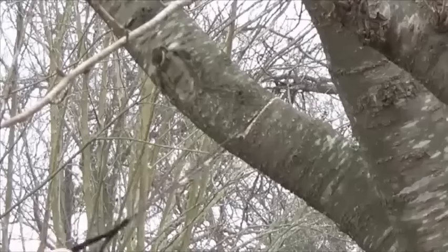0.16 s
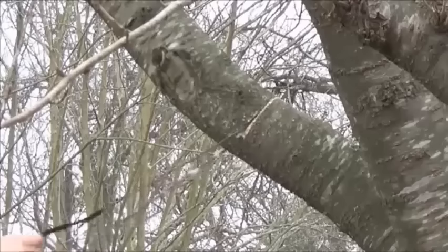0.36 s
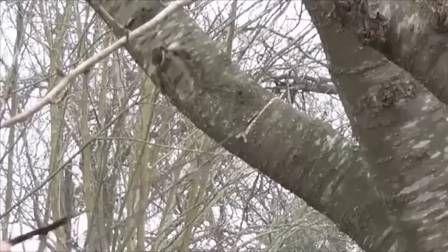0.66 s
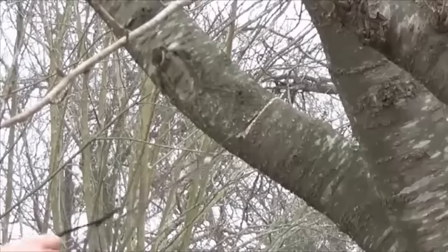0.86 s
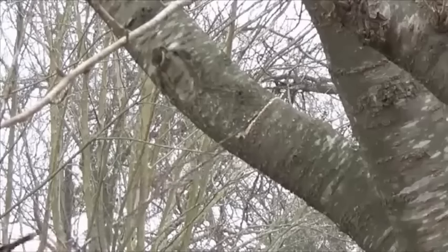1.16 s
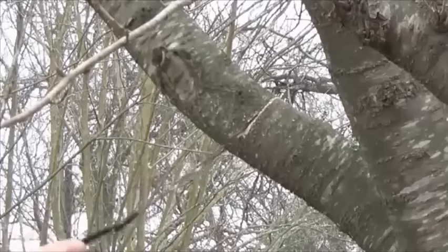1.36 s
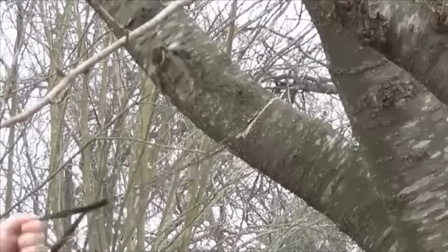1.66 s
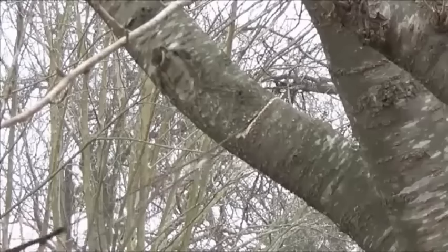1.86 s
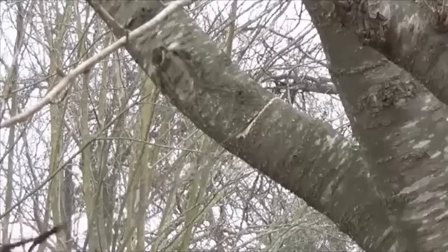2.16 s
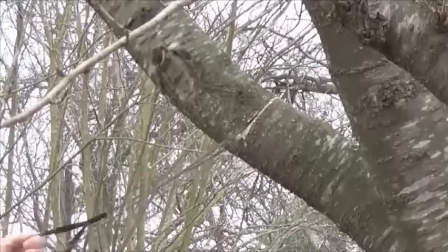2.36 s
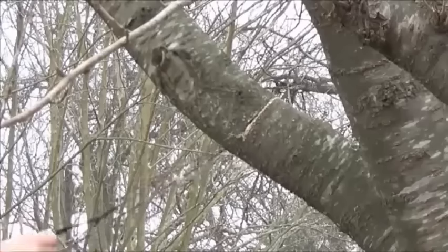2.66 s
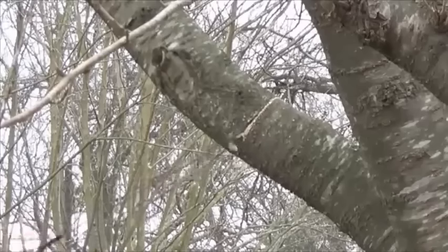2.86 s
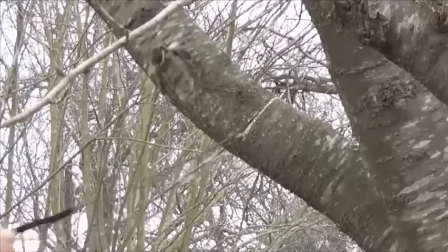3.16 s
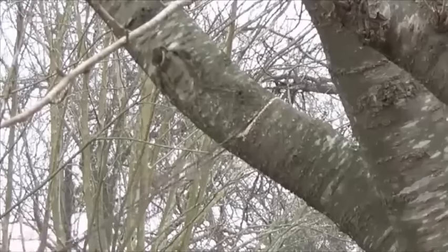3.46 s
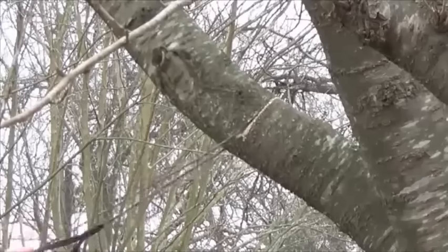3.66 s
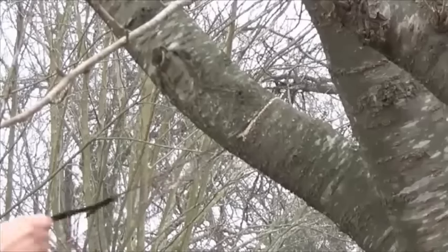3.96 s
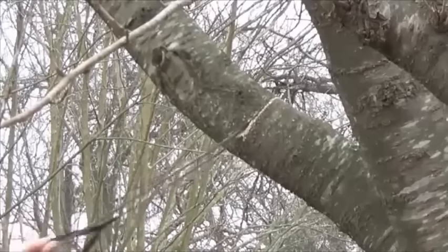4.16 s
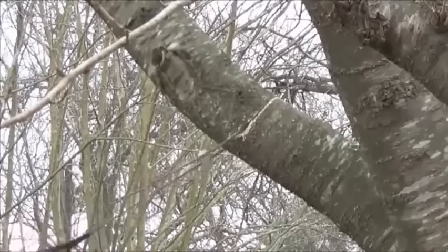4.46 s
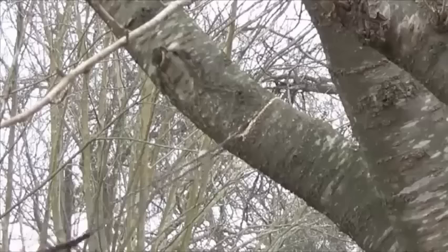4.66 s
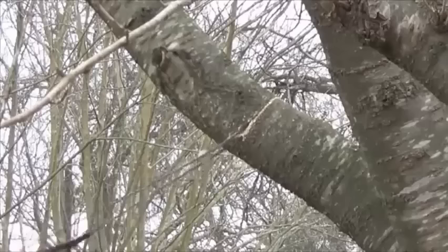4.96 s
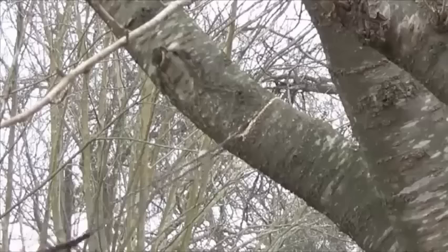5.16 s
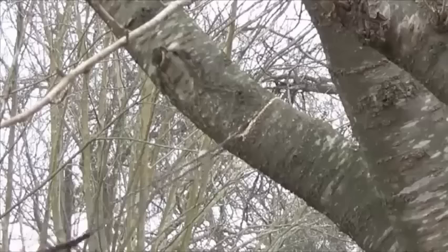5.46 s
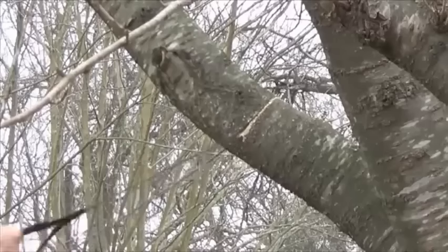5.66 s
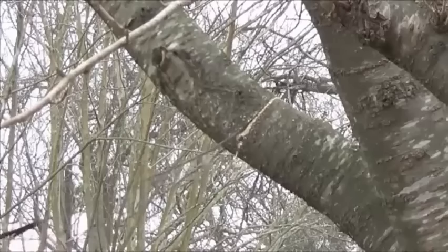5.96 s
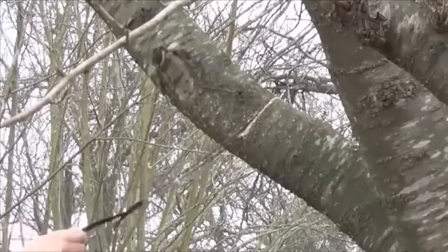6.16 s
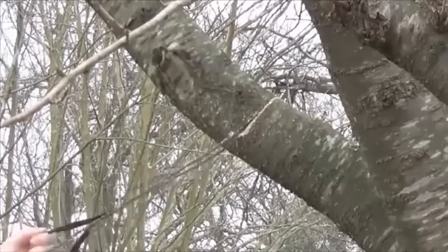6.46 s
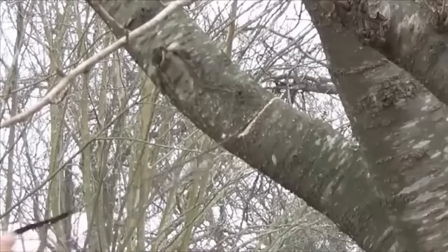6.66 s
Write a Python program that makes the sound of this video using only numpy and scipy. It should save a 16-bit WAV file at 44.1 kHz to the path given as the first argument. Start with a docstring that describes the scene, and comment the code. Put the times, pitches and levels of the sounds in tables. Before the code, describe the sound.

A hand-pulled chain saw rasps back and forth through a tree limb outdoors, with woody chatter, rattling links and faint bird whistles.

```python
"""A hand chain saw rasps back and forth through a tree limb near the microphone, about three pulls a second.
Each pull speeds up, holds and slows: teeth knock the limb, steel links ring and fibres tear;
roughly every other pull bites deeper and sprays a bright fizz. The slack chain rattles in the turns.
Behind it, outdoors and in mono: faint air, a far engine and a few thin rising whistles like a bird's."""
import sys
import numpy as np
from scipy import signal
from scipy.fft import rfft, irfft
from scipy.io import wavfile
from scipy.ndimage import uniform_filter1d

SR = 44100
rng = np.random.default_rng(int(sys.argv[2]) if len(sys.argv) > 2 else 0)


def persist_wave(psi):
    """Save psi, clipped to +-1, as 16-bit WAV."""
    counts = np.round(np.clip(psi, -1, 1) * 32767).astype(np.int16)
    wavfile.write(sys.argv[1], SR, np.atleast_2d(counts).T)


N = 299880
TIME = np.arange(N) / SR
HZ = np.fft.rfftfreq(N, 1 / SR)


def gain_of(db):
    """Decibels to amplitude."""
    return 10 ** (np.asarray(db) / 20)


def unit_rms(x):
    """Scales to rms 1."""
    return x / np.sqrt(np.mean(x ** 2) + 1e-20)


def add(mix, start_s, sound):
    """Mixes a sound in at a time."""
    part = mix[max(round(start_s * SR), 0):][:len(sound)]
    part += sound[:len(part)]


def wander(rate_hz):
    """Smooth random drift of rms 1, mostly slower than rate_hz."""
    return unit_rms(irfft(rfft(rng.standard_normal(N)) / (1 + (HZ / rate_hz) ** 4), N))


def swell(middle_s, length_s):
    """A brief smooth rise and fall."""
    return np.exp(-(2 * (TIME - middle_s) / length_s) ** 2)


def eased(u):
    """Rises smoothly from 0 to 1 as u does."""
    return np.sin(np.pi / 2 * np.clip(u, 0, 1)) ** 2


def coloured(x, spectrum):
    """Filters by a spectrum and scales to rms 1."""
    freq_hz, gain_db = np.transpose(spectrum)
    curve_db = np.interp(np.log(HZ + 1), np.log(freq_hz), gain_db)
    return unit_rms(irfft(rfft(x) * gain_of(curve_db), N))


def ring(drive, modes):
    """Drives a set of damped modes; a unit blow rings with a peak of 1."""
    t = np.arange(4096) / SR
    response = np.zeros(len(t))
    for k, (hz, width_hz, db) in enumerate(modes):
        decay = gain_of(db) * width_hz * np.exp(-np.pi * width_hz * t)
        response += (-1) ** (k // 2) * decay * np.sin(2 * np.pi * hz * t)
    return signal.oaconvolve(drive, response / abs(response).max())[:N]


def blows(rows):
    """One impulse for each row of start_s, level_db."""
    out = np.zeros(N)
    for start_s, db in rows:
        add(out, start_s, gain_of([db]))
    return out


def grains(per_s, spread_db):
    """Random tiny impulses of uneven size and either sign."""
    size = gain_of(spread_db * np.minimum(rng.exponential(1, N), 4)) * rng.choice([-1, 1], N)
    return unit_rms(size * (rng.random(N) < per_s / SR))


# Tone of the open air: freq_hz, gain_db
AIR_SPECTRUM = [(20, -45), (45, -19.5), (80, -5.5), (130, -5.5), (200, -4), (550, -18), (800, -14),
                (1200, -17.5), (3000, -26), (10000, -57), (16000, -42)]
# Its rise and fall at the microphone: time_s, level_db
AIR_LEVELS = [(0, -36), (.5, -36.5), (1.2, -38.5), (2.1, -36.5), (3, -38.5), (3.7, -36.5), (4.5, -36),
              (5.15, -34), (5.5, -38.5), (6.2, -36.5), (6.8, -40.5)]
def outdoor_air(swell_db=1.5):
    """Low noise of the air all around, swelling gently."""
    level_db = np.interp(TIME, *np.transpose(AIR_LEVELS)) + swell_db * wander(3.1)
    return gain_of(level_db) * coloured(rng.standard_normal(N), AIR_SPECTRUM)


# An engine far off: time_s, pitch_hz, level_db
ENGINE_PATH = [(0, 118.5, -48), (.5, 118.8, -47.5), (1.201, 125.1, -45), (2, 130.6, -42.5),
               (2.798, 130.5, -45), (3.799, 135.2, -45), (4.3, 137.2, -43), (4.699, 140.6, -41),
               (5.3, 142.5, -45.5), (5.8, 143.9, -75), (6.8, 139.6, -48)]
# Its harmonics: multiple, gain_db
ENGINE_HARMONICS = [(1, 3), (2, -1), (4, 7)]
def far_engine(waver=0.01, flicker_db=1.5):
    """A distant engine drones on three harmonics that waver in pitch and level."""
    time_s, pitch_hz, level_db = np.transpose(ENGINE_PATH)
    cycles = np.cumsum(np.interp(TIME, time_s, pitch_hz) * (1 + waver * wander(16.5))) / SR
    out = np.zeros(N)
    for multiple, gain_db in ENGINE_HARMONICS:
        level = gain_of(np.interp(TIME, time_s, level_db) + gain_db + flicker_db * wander(4.7))
        out += level * np.sin(2 * np.pi * multiple * cycles)
    return out


# Soft bumps in the background: middle_s, length_s, pitch_hz, level_db
BUMPS = [(0.118, 0.065, 94.6, -44), (2.05, 0.085, 103.9, -29.5), (3.8, 0.19, 132, -35)]
def low_bumps():
    """Low, unsteady tones swell and fade in a moment."""
    out = np.zeros(N)
    for middle_s, length_s, hz, db in BUMPS:
        tone = np.sqrt(2) * np.sin(2 * np.pi * hz * TIME + wander(29))
        out += gain_of(db) * swell(middle_s, length_s) * tone
    return out


# Whistles far from the microphone, one list each: time_s, pitch_hz, level_db
WHISTLES = [
    [(2.12, 2330, -44), (2.22, 2430, -38), (2.27, 2420, -44), (2.33, 2400, -60)],
    [(4.5, 2850, -50), (4.55, 2950, -43), (4.61, 3080, -48)],
    [(5.28, 2060, -42), (5.36, 2230, -35), (5.45, 2510, -38), (5.52, 2830, -32), (5.6, 3040, -36),
     (5.68, 3240, -35.5), (5.75, 3460, -44)],
]
def far_bird():
    """Thin, fluttering whistles that glide upward."""
    out = np.zeros(N)
    bend, flutter = 1 + .006 * wander(110), gain_of(1.4 * wander(60))
    for whistle in WHISTLES:
        time_s, pitch_hz, level_db = np.transpose(whistle)
        cycles = np.cumsum(np.interp(TIME, time_s, pitch_hz) * bend) / SR
        sounding = (TIME > time_s[0]) & (TIME < time_s[-1])
        level = uniform_filter1d(gain_of(np.interp(TIME, time_s, level_db)) * sounding, size=600)
        out += level * flutter * np.sin(2 * np.pi * cycles)
    return out


def tree_echo(sound, echo_db=-20, t60_s=0.43, gap_s=.008):
    """Trunks and twigs around the saw scatter a faint, short echo back to the microphone."""
    t = TIME[:SR // 2]
    taps = rng.standard_normal(len(t)) * (rng.random(len(t)) < .03)
    taps *= (t > gap_s) * gain_of(-60 * t / t60_s)
    return gain_of(echo_db) * signal.oaconvolve(sound, taps / np.linalg.norm(taps))[:N]


def link_glints(force, per_s=2400, ring_s=.008, spread_db=0.8):
    """Links and cutters strike one another; each contact rings briefly at its own high pitch."""
    out, t = np.zeros(N), np.arange(1200) / SR
    pitches_hz = np.linspace(4500, 15500, 500)
    pings = np.exp(-t / ring_s) * np.sin(2 * np.pi * pitches_hz[:, None] * t)
    when, softness, pitch = rng.random((int(per_s * TIME[-1]), 3)).T
    peaks = force[(when * N).astype(int)] * gain_of(-spread_db * np.log(softness + 0.017))
    for start_s, peak, k in zip(when * TIME[-1], peaks, (pitch * len(pings)).astype(int)):
        add(out, start_s, peak * pings[k])
    return unit_rms(out)


# Tone of the loose chain outside the cut: freq_hz, gain_db
SLACK_SPECTRUM = [(500, 8.5), (1000, -9), (2500, 9.5), (4500, 3.5), (8000, 2.5), (11000, -9), (13500, -7),
                  (16000, -16)]
def slack_rattle(glints, level, rattle_db=-1, flutter_db=2.5, glint_db=-4):
    """The loose lengths of chain never stop rattling softly, even between pulls."""
    shake = gain_of(flutter_db * wander(46))
    contacts = grains(per_s=2000, spread_db=2.6) + gain_of(glint_db) * glints
    return level * gain_of(rattle_db) * coloured(shake * contacts, SLACK_SPECTRUM)


# Tone of the steel, ticking here and scraping in the cut: freq_hz, gain_db
STEEL_SPECTRUM = [(400, -50), (1000, -2.5), (1600, -1.5), (2600, 1), (4200, 2), (5600, -4.5), (7500, -2.5),
                  (11000, -6.5), (14000, -18), (16000, -14)]
# The slack chain ticks close by: start_s, relative_db
TICKS = [(1.9627, -16), (2.9167, -20), (3.2031, -22), (3.245, -14), (3.551, -16), (4.1486, -23),
         (6.7362, -16), (6.7675, -13.5)]
# A hollow pop and a sharp pip: middle_s, pitch_hz, peak_db, half_length_s
POPS = [(3.529, 878, -12.5, 0.00062), (5.3428, 5200, -18, .0008)]
def chain_ticks(decay_s=0.0021, tick_db=-9):
    """Dry ticks and short pops while the chain turns round."""
    out, t = np.zeros(N), np.arange(1024) / SR
    for start_s, db in TICKS:
        add(out, start_s, gain_of(db + tick_db) * np.exp(-t / decay_s))
    out *= coloured(rng.standard_normal(N), STEEL_SPECTRUM)
    for middle_s, hz, db, half_length_s in POPS:
        t = TIME - middle_s
        out += gain_of(db) * np.exp(-(t / half_length_s) ** 2) * np.cos(2 * np.pi * hz * t)
    return out


# Bright fizz of cut wood at close range: freq_hz, gain_db
FIZZ_SPECTRUM = [(2000, -24), (5000, -23), (7200, -8.5), (9300, -3.5), (10500, 0.5), (11400, 2),
                 (12300, -2.5), (13000, -11), (13700, -16), (15000, -14.5), (16000, -5)]
def fibre_fizz(force, glints, level, fizz_db=-4.5):
    """Dense tiny fractures as the cutters shave the wood, and the cutters' own ringing."""
    cutting = force * grains(per_s=10000, spread_db=0.96) + glints
    return level * gain_of(fizz_db) * coloured(cutting, FIZZ_SPECTRUM)


# Resonances of the steel links: pitch_hz, width_hz, gain_db
LINK_MODES = [(2500, 600, -13), (3323, 145, -8), (3520, 110, 5.5), (4380, 310, -11), (4920, 87, -4),
              (4940, 44, -2)]
# Links clink together near the microphone: start_s, relative_db
CLINKS = [(0.3865, -15), (1.6114, -19), (2.5232, -14), (3.2869, -23), (3.589, -14.5), (3.903, -11),
          (5.2579, -12), (5.6297, -12.5)]
def chain_rasp(force, glints, level, scrape_db=-1, glint_db=-9, links_db=-4, clink_db=-1, flex_s=8e-5):
    """Steel scrapes through the cut and its links ring, even under a light pull."""
    scrape = gain_of(scrape_db) * coloured(force * grains(per_s=5000, spread_db=1.65), STEEL_SPECTRUM)
    jingle = gain_of(glint_db) * coloured(glints, STEEL_SPECTRUM)
    links = ring(force * grains(per_s=450, spread_db=1.7), LINK_MODES)
    links = unit_rms(np.interp(TIME + flex_s * wander(18), TIME, links))  # tension bends their pitch
    link_level = unit_rms(level ** 0.84) * np.sqrt(np.mean(level ** 2))  # same rms, shallower dips
    clinks = gain_of(clink_db) * ring(blows(CLINKS), LINK_MODES)
    return level * (scrape + jingle) + link_level * gain_of(links_db) * links + clinks


def tooth_catches(speed, per_s=150, jitter=.45, uneven_db=1.0):
    """Teeth enter the cut at an irregular rate that follows the chain's speed."""
    teeth_passed = np.cumsum(per_s * speed * np.exp(jitter * wander(90))) / SR
    entering = np.diff(np.floor(teeth_passed), prepend=0) > 0
    return entering * gain_of(uneven_db * np.clip(rng.standard_normal(N), -2, 2))


def grip_force(catches, release_s=0.0013, depth=0.19, flutter_db=0.18):
    """Each catch presses the chain into the wood for a moment, on top of steady drag."""
    pressed = unit_rms(signal.lfilter([1], [1, -np.exp(-1 / (release_s * SR))], catches))
    return unit_rms((1 + depth * pressed) * gain_of(-flutter_db * wander(250)))


# Resonances of the limb in front of the microphone: pitch_hz, width_hz, gain_db
LIMB_MODES = [(302.4, 84, -6.5), (346, 30, -1.5), (408, 56, 1.5), (476, 50, -7.5), (559, 40, -8),
              (591, 33, -1), (665, 79, -2.5), (735, 68, -8.5), (853, 49, -17), (974, 45, -12.5),
              (1021, 38, -11.5), (1270, 36, -14.5)]
# Broad tone of the shaken limb: freq_hz, gain_db
SWAY_SPECTRUM = [(30, -50), (90, -25), (200, -8.5), (280, 1), (700, 3), (880, -37), (1600, -41),
                 (4000, -25)]
# The teeth dig in and the limb judders: middle_s, length_s, relative_db
DIGS = [(1.523, 0.028, -22), (1.776, 0.049, -23), (1.89, 0.024, -22), (2.155, 0.078, -25.0),
        (2.499, 0.029, -21.5), (2.83, 0.064, -21.5), (3.061, 0.044, -20), (3.111, 0.015, -21),
        (3.155, 0.02, -16), (3.633, 0.025, -23), (3.998, 0.016, -25), (4.305, 0.041, -23),
        (4.788, 0.048, -19.5), (5.126, 0.031, -23), (5.2, 0.039, -19), (5.555, 0.063, -18.5),
        (5.928, 0.043, -28)]
# A single tooth snags and breaks free: time_s, relative_db
SNAGS = [(0.03, -9), (0.987, -10), (1.758, -11), (2.091, -8), (3.302, -10), (3.39, -10), (3.902, -8.5),
         (6.099, -7), (6.493, -9), (6.617, -9)]
def limb_knock(catches, force, level, catch_db=-1, modes_db=-0.48, sway_db=-10,
               snag_db=-5.5, dig_db=-0.5, dig_hz=480):
    """Catches and drag shake the limb: a hollow wooden chatter, deeper judders and a few hard snags."""
    knocks = gain_of(catch_db) * unit_rms(catches - catches.mean())
    drive = knocks + force * grains(per_s=2500, spread_db=1.7)
    chatter = unit_rms(ring(drive, LIMB_MODES))
    wood = gain_of(modes_db) * chatter + gain_of(sway_db) * coloured(drive, SWAY_SPECTRUM)
    # dug-in teeth push slowly, on the lowest modes
    deep = unit_rms(irfft(rfft(chatter) / (1 + (HZ / dig_hz) ** 2), N))
    judder = deep * sum(gain_of(db) * swell(middle_s, length_s) for middle_s, length_s, db in DIGS)
    push = np.hanning(80)  # a snag lets go softly, so the lowest modes ring most
    snags = signal.oaconvolve(blows(SNAGS), 2 * push / push.sum(), "same")
    return level * wood + gain_of(dig_db) * judder + gain_of(snag_db) * ring(snags, LIMB_MODES)


# Each pull of the saw; growth is the knocking's rise from start to end, rattle is the turn before it:
# start_s, length_s, speed_up_s, slow_down_s, knock_db, rasp_db, fizz_db, growth_db, rattle_db
PULLS = [(-0.052, 0.278, 0.107, 0.168, -24.5, -29.5, -29, -32, -37.0),
         (0.191, 0.352, 0.034, 0.19, -23.5, -30.5, -28.5, -4, -35.0),
         (0.478, 0.328, 0.102, 0.154, -21.0, -27.0, -28.0, 5, -34.5),
         (0.792, 0.295, 0.042, 0.158, -22, -31.0, -31, 12, -37.5),
         (1.079, 0.271, 0.104, 0.06, -21.5, -31.5, -34.5, -7, -41.0),
         (1.364, 0.337, 0.09, 0.182, -21.5, -30.0, -29.5, 10, -37.5),
         (1.665, 0.293, 0.133, 0.059, -22.5, -30.0, -32.5, -5, -41.5),
         (1.964, 0.3, 0.085, 0.053, -26.5, -28.5, -29, -2, -35.5),
         (2.324, 0.284, 0.032, 0.077, -23.5, -30.5, -45, -9.5, -39.0),
         (2.622, 0.328, 0.054, 0.184, -24, -27.0, -28, -3, -37.5),
         (2.959, 0.277, 0.038, 0.075, -24.5, -31.0, -40, -19, -39.5),
         (3.225, 0.314, 0.062, 0.152, -20.5, -28.5, -25.5, 16, -40.5),
         (3.552, 0.256, 0.082, 0.041, -20.5, -28.5, -38, -7, -37.5),
         (3.823, 0.385, 0.09, 0.192, -21.0, -28.0, -26.0, -6, -38.0),
         (4.171, 0.379, 0.079, 0.093, -22, -30.5, -26.5, 6.5, -41.0),
         (4.571, 0.358, 0.078, 0.079, -21, -28.5, -25.5, -1.5, -37.5),
         (4.978, 0.366, 0.075, 0.074, -21.5, -31.0, -25, 6.5, -39.0),
         (5.367, 0.301, 0.047, 0.052, -21.5, -28.0, -26, 0, -32.5),
         (5.708, 0.331, 0.142, 0.074, -18, -29.5, -31, 3.5, -35.0),
         (6.07, 0.307, 0.052, 0.065, -18.5, -27.0, -24.5, 1, -37.0),
         (6.419, 0.361, 0.125, 0.113, -20.0, -29.0, -27.5, -15, -36.0),
         (6.753, 0.302, 0.06, 0.1, -25.5, -31.5, -28, 0.5, -35.5)]
# The cutters bite deep, mostly on every other pull: middle_s, length_s, fizz_db, rasp_db
BITES = [(0.016, 0.072, -18, -39.5), (0.273, 0.059, -36, -27.0), (0.623, 0.079, -17, -38.0),
         (1.217, 0.085, -17, -41.5), (1.82, 0.074, -12.5, -36.0), (2.445, 0.118, -15, -39.0),
         (3.07, 0.099, -14, -33.0), (3.672, 0.104, -13, -38.5), (4.344, 0.082, -14.5, -30.5),
         (4.472, 0.047, -24.5, -33.5), (5.159, 0.064, -11.5, -30.5), (5.873, 0.069, -14.5, -39.0),
         (5.981, 0.042, -19.5, -31.0), (6.479, 0.057, -21, -44.0), (6.588, 0.048, -13.5, -36.5)]
def pull_levels(arch_db=5, turn_knock_db=-35.5, turn_rasp_db=-12, turn_fizz_db=-10):
    """Each pull speeds up, holds and slows; gives the gains of knocking, rasp, fizz and slack rattle."""
    knock, rasp, fizz = np.zeros((3, N))
    for start_s, length_s, speed_up_s, slow_down_s, knock_db, rasp_db, fizz_db, growth_db, _ in PULLS:
        t = TIME - start_s
        pull = eased(t / speed_up_s) * eased((length_s - t) / slow_down_s)
        from_middle = np.clip(t / length_s, 0, 1) - .5
        knock += pull * gain_of(knock_db + growth_db * from_middle - arch_db * (2 * from_middle) ** 2)
        rasp += pull * gain_of(rasp_db)
        fizz += pull * gain_of(fizz_db)
    for middle_s, length_s, fizz_db, rasp_db in BITES:
        bite = swell(middle_s, length_s)
        fizz += gain_of(fizz_db) * bite
        rasp += gain_of(rasp_db) * bite
    starts_s, *_, rattle_db = np.transpose(PULLS)
    rattle = gain_of(np.interp(TIME, starts_s, rattle_db))
    # in the turns the limb still trembles and the slack chain drags in the cut
    knock = np.hypot(knock, gain_of(turn_knock_db))
    rasp = np.hypot(rasp, gain_of(turn_rasp_db) * rattle)
    fizz = np.hypot(fizz, gain_of(turn_fizz_db) * rattle)
    return knock, rasp, fizz, rattle


def scene(knots_db=1.0, knots_hz=18, grain_db=1.5, grain_hz=20):
    """The same teeth drive limb, links and fibres; saw and background sit dead centre."""
    knock, rasp, fizz, rattle = pull_levels()
    knots = gain_of(knots_db * wander(knots_hz))  # the wood resists unevenly
    grain = gain_of(grain_db * wander(grain_hz))
    catches = tooth_catches(speed=unit_rms(rasp ** .3))  # a faster chain rasps louder
    force = grip_force(catches)
    glints = link_glints(force)
    saw = limb_knock(catches, force, knock * knots)
    saw += chain_rasp(force, glints, rasp * grain)
    saw += fibre_fizz(force, glints, fizz * grain)
    saw += slack_rattle(glints, rattle) + chain_ticks()
    mix = saw + tree_echo(saw) + outdoor_air() + far_engine() + low_bumps() + far_bird()
    return np.array([mix, mix])


def record(dry):
    """The recorder cuts off the highest treble."""
    edge_hz = 15750
    lowpass = signal.firwin(511, edge_hz, window=("kaiser", 9), fs=SR)
    return signal.oaconvolve(dry, lowpass[None], "same")


dry = scene()
out = record(dry)
persist_wave(out)
```